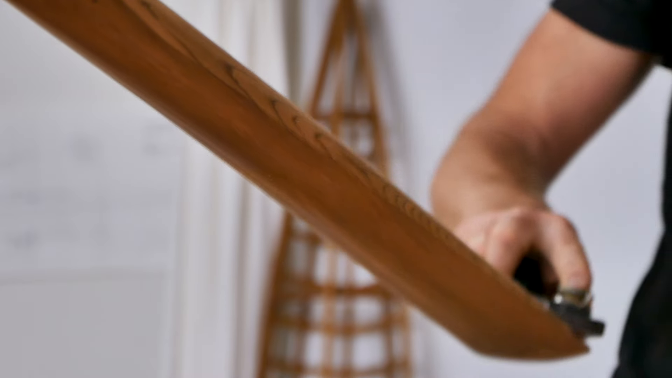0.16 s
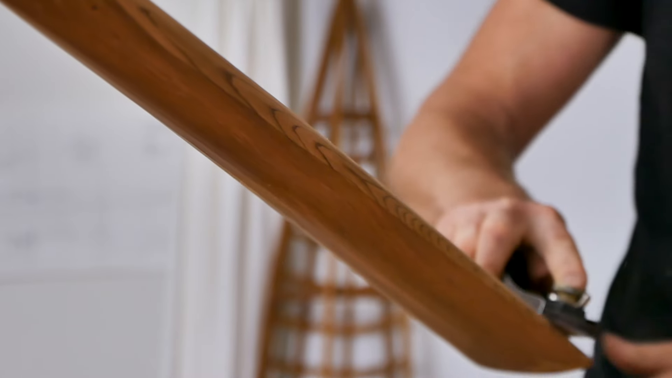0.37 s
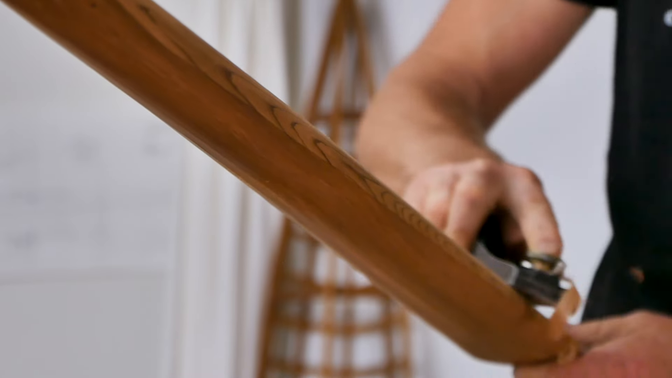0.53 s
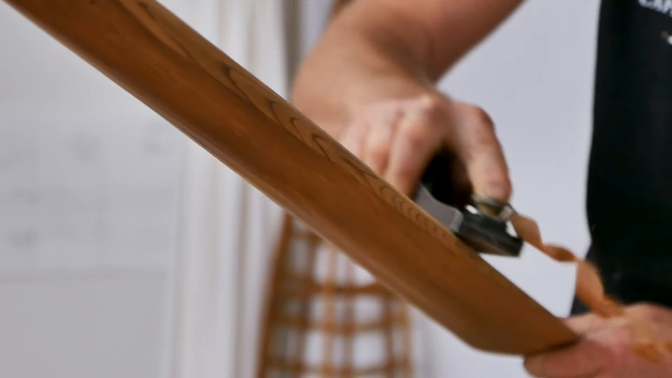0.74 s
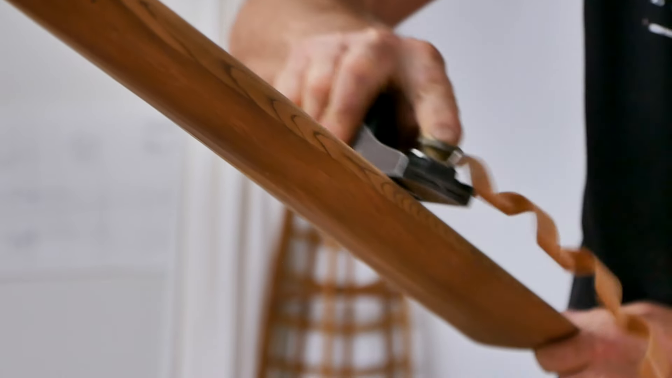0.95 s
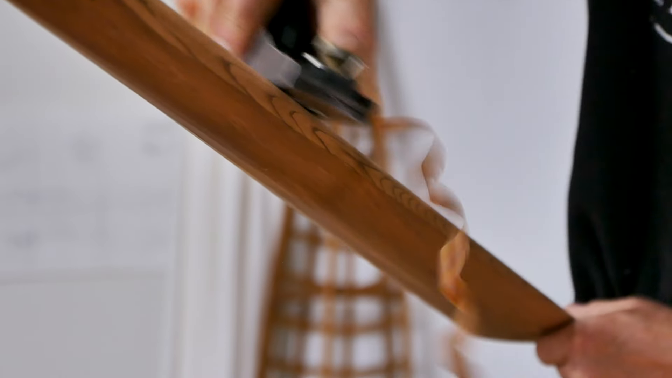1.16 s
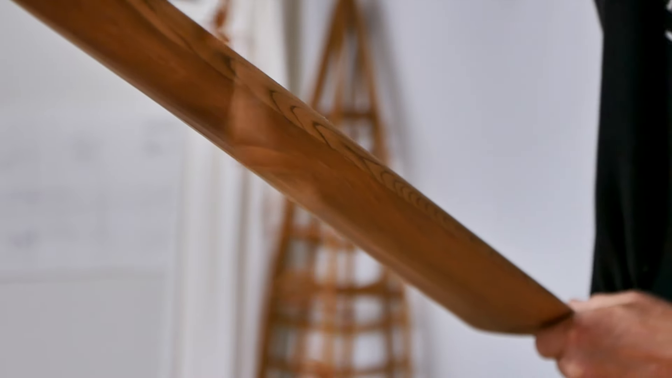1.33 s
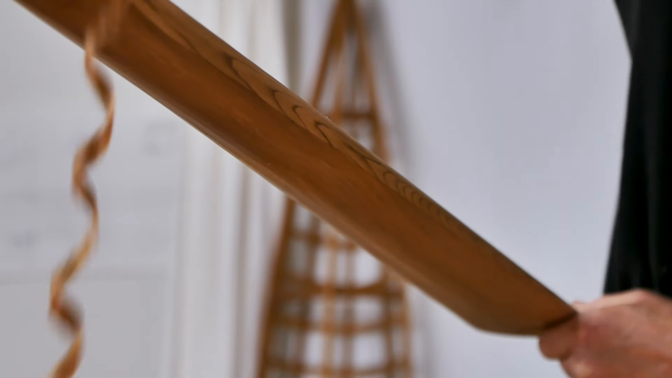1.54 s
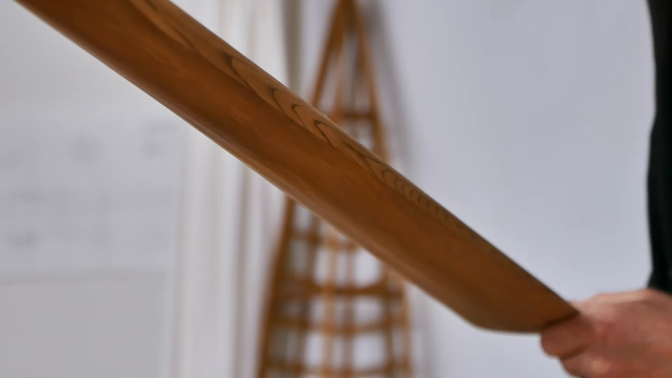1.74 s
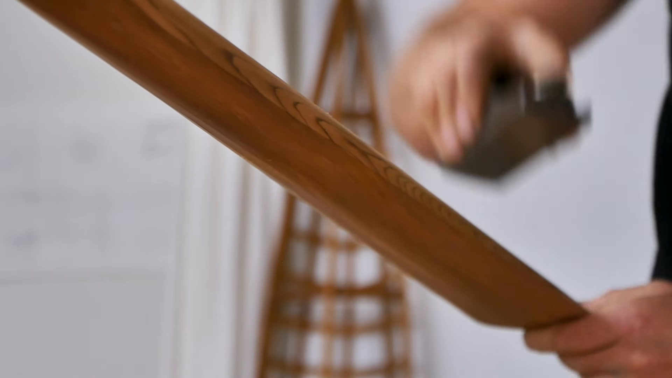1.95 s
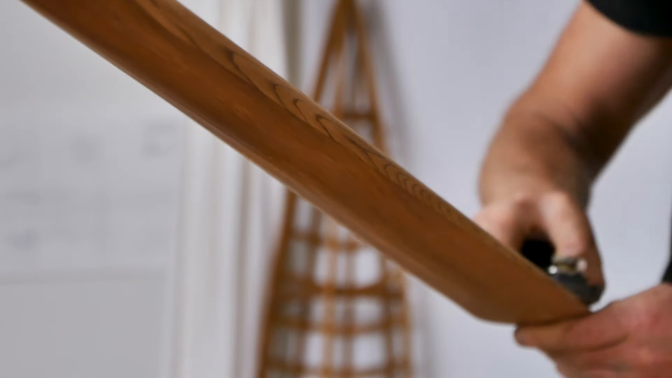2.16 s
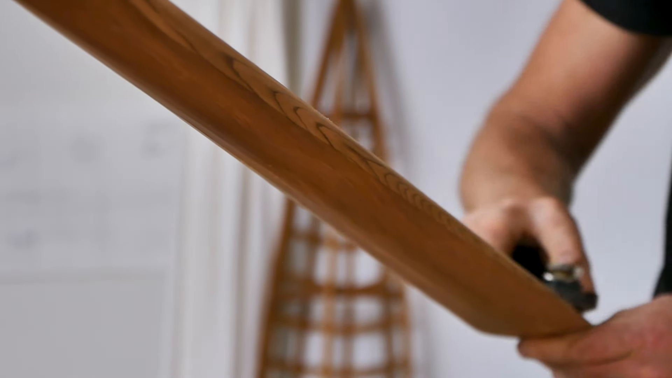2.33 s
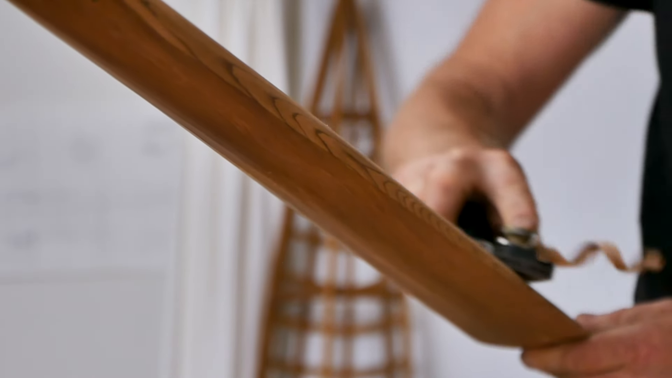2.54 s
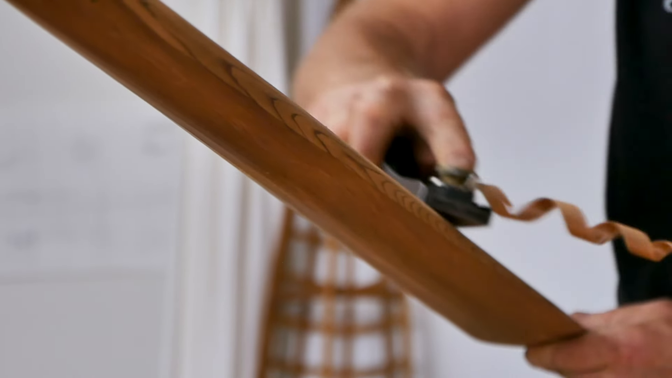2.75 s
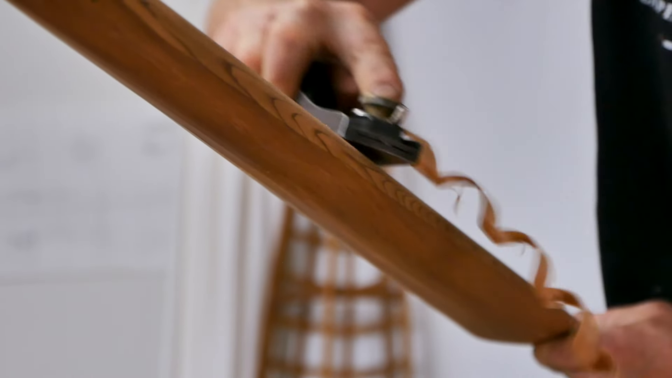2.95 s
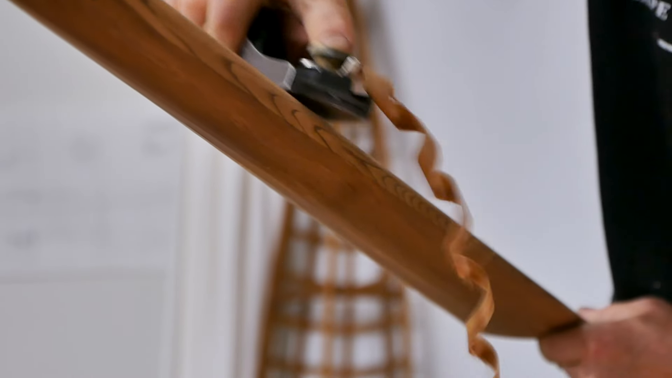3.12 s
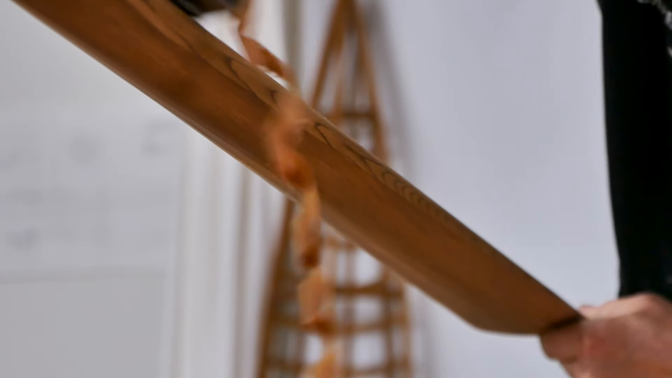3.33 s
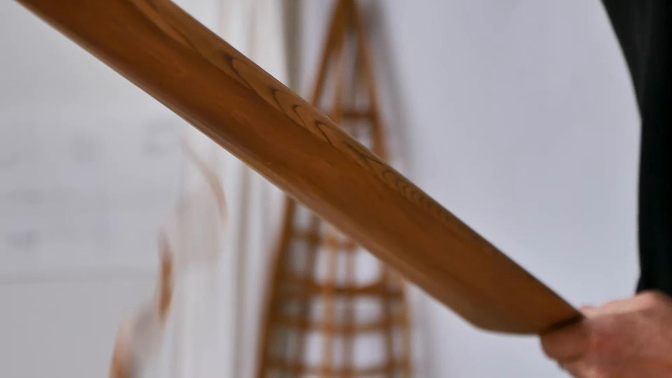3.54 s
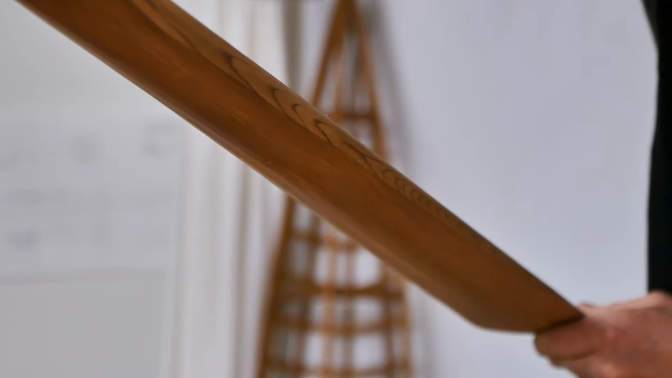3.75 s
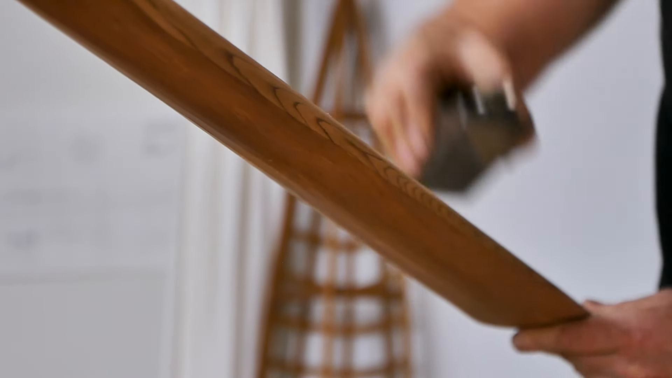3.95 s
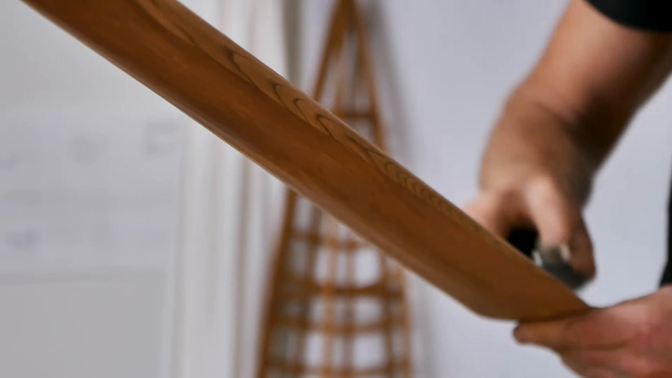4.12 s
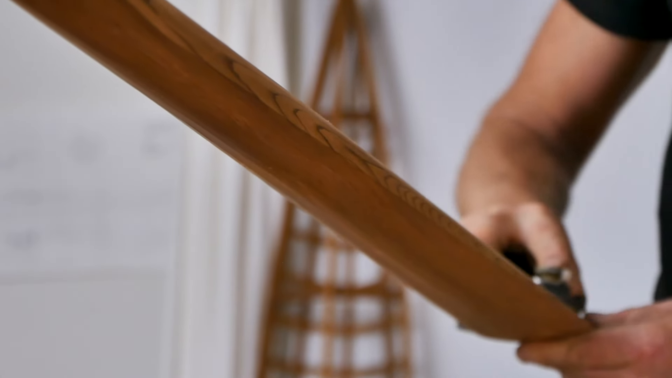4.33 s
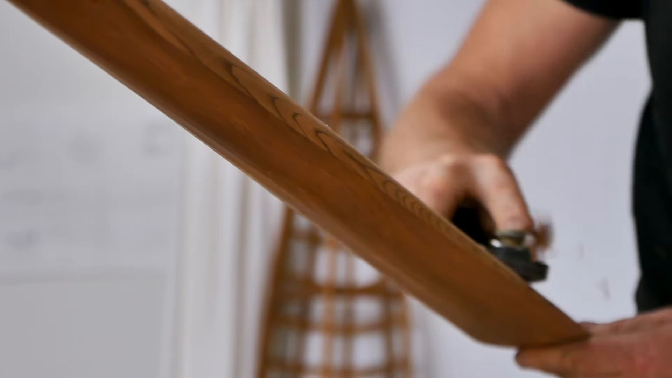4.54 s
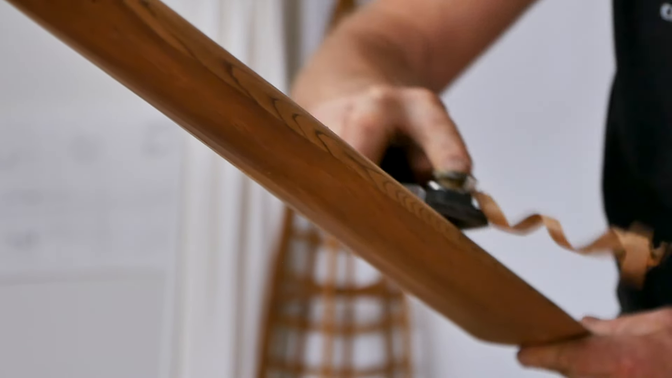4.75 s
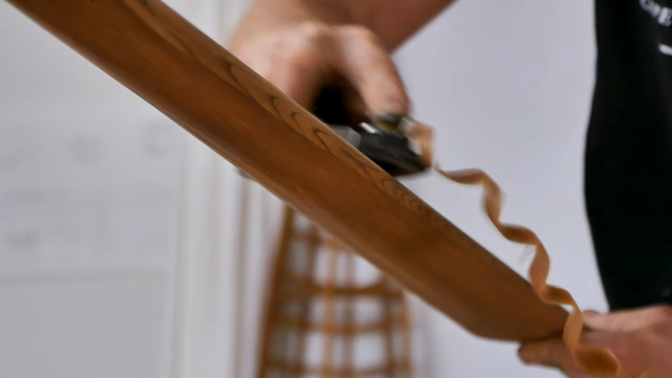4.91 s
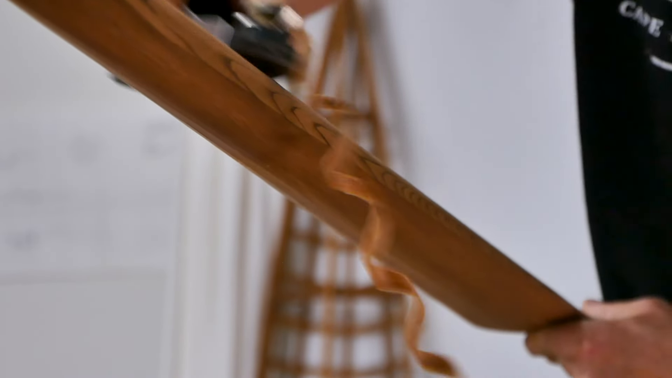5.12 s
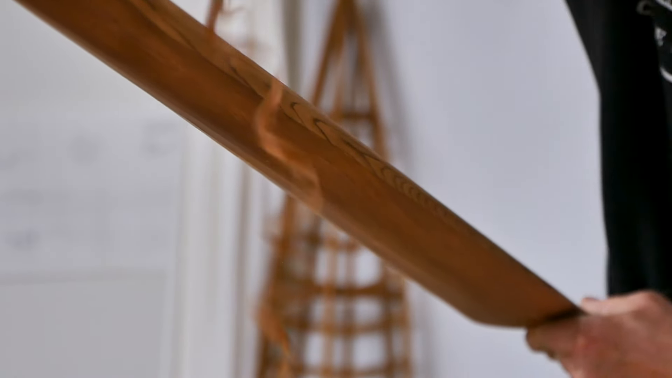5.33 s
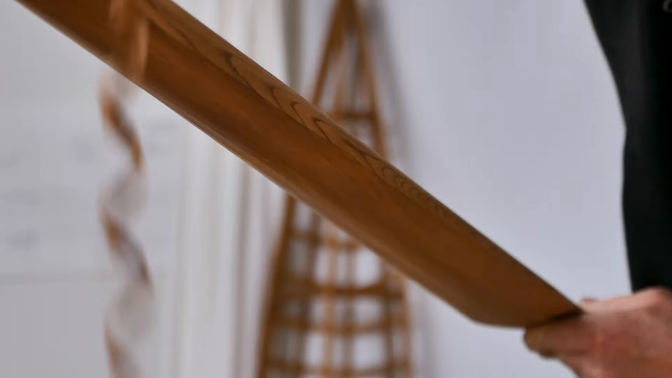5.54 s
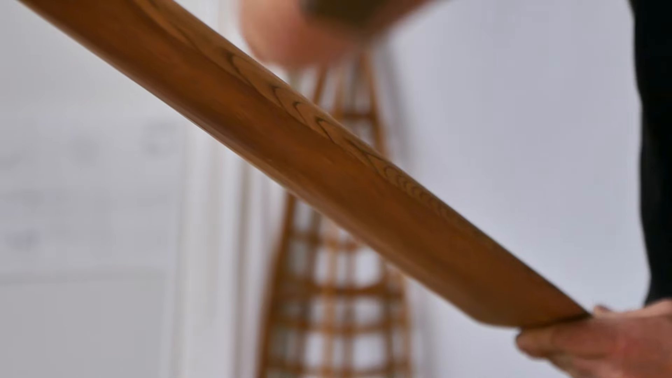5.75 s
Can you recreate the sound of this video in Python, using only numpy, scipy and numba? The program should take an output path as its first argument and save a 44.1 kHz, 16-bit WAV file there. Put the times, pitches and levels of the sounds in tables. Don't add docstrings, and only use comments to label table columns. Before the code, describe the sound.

Close in a small, quiet workshop, a block plane lands on a softwood board with a soft knock, then tears along it in a long crackling hiss. It lifts off; a sleeve rustles faintly and the holding hand bumps. Two more strokes follow, with sharper knocks, the third landing loudest. One close microphone, short room echo.

```python
import sys
import numpy as np
from scipy import signal
from scipy.fft import rfft, irfft, next_fast_len
from scipy.io import wavfile
from scipy.ndimage import uniform_filter1d, map_coordinates
from numba import njit

SR = 44100
rng = np.random.default_rng(int(sys.argv[2]) if len(sys.argv) > 2 else 0)


def store_pcm(level_fs):
    pcm = np.round(np.clip(level_fs, -1, 1) * 32767).astype(np.int16)
    wavfile.write(sys.argv[1], SR, np.atleast_2d(pcm).T)


def ratio(d):
    e = np.asarray(d, float) / 20
    return 10 ** e


N = 259308
TIME = np.arange(N) / SR

# start_s, end_s
STROKE_SPANS = [
    (.115, 1.53),
    (2.262, 3.54),
    (4.247, 5.49),
]
# time_s, edge_load_db, sliding_speed_db
STROKES = [
    [(.115, -71, -96), (.193, -51, -54), (.359, -46, -49), (.46, -34.5, -37), (.62, -36.5, -33),
     (.76, -33.5, -35), (1.17, -35, -36.5), (1.437, -32.5, -36), (1.53, -48, -70)],
    [(2.262, -62, -79), (2.346, -50, -52), (2.456, -34, -36), (2.682, -32, -35), (2.98, -33.5, -37),
     (3.19, -38, -37.5), (3.34, -33.5, -33), (3.49, -35, -42.5), (3.54, -47, -66)],
    [(4.247, -46, -74), (4.38, -45.5, -50.5), (4.435, -34.5, -38.5), (4.533, -28.5, -33.5), (4.7, -33, -38),
     (5.0, -33.5, -38.5), (5.4, -31, -35), (5.453, -32, -37), (5.49, -33, -60.5)],
]
LIFTS = [1.492, 3.517, 5.468]
# pitch_hz, width_hz, level_db, half_waves_along_stroke, start_half_waves
BOARD = [(419, 41, -0.5, 1.12, 0.037), (511, 45, 3, 2.17, 0.41), (612, 48, 3.5, 1.56, 0.99),
         (693, 36, 0.5, 2.82, 0.56), (756.4, 36, 3.5, 1.63, 0.75), (867.5, 56, 2.5, 2.5, 0.34),
         (938, 61, 6.5, 1.86, 0.95), (1014, 45, 2, 2.9, 0.1), (1062, 17, 0.5, 2.85, 0.042),
         (1199, 70, 3, 2.8, 0.03), (1341, 88, 2, 1.42, 0.14), (1470, 220, -5.5, 3.25, 0.045),
         (1739, 15, -6, 3.6, 0.17), (1744, 130, -4.5, 4.4, 0.52), (1892, 190, -3, 2.34, 0.24)]
# pitch_hz, width_hz, level_db
THRUM = [(95.3, 30, -38), (160, 64, 2.5), (246, 35, -1.5), (341, 21, -17)]
# pitch_hz, width_hz, stroke_start_db, stroke_end_db
IRON = [(2390, 130, -8.5, -7), (3160, 550, -25, -41), (4280, 300, -2.5, -7.5), (4780, 290, -15.5, -8)]
# pitch_hz, level_db (per Hz)
CRACKLE = [(880, -13.5), (1500, -2), (1760, 0), (2040, -7), (2380, -5), (3450, -5), (8000, -15.5),
           (10400, -12.5), (17600, -120)]
# pitch_hz, level_db (per Hz)
HISS = [(3530, -41), (6000, -6), (6890, -5), (8640, -6), (10300, -2.5), (13800, 2.5), (15800, -1)]
# middle_s, length_s,
# load_db, hiss_db
GRAIN = [(0.503, 0.021, -14, -2), (0.573, 0.037, -2.5, -3.5), (0.625, 0.03, 0, 3.5),
         (0.688, 0.071, -5.5, -2.5), (1.183, 0.046, -3, -2.5), (1.24, 0.037, -0.5, 4.5),
         (1.281, 0.034, -3.5, -3.5), (1.336, 0.026, -0.2, 2), (1.377, 0.046, -16.5, -5.5),
         (3.035, .05, 3.5, 0), (3.284, 0.1, 4.5, 3), (3.407, 0.031, -4.5, 4), (3.472, 0.035, -20, -7),
         (4.638, 0.047, 1.5, 2), (4.93, 0.075, 2, 0.5), (5.155, 0.035, -7, -2), (5.423, 0.028, -1.5, -3.5),
         (0.38, 0.027, -1.5, 1), (.34, .05, 2, 0), (5.36, 0.027, -2, -1), (5.33, 0.022, 4, -0.5),
         (4.575, .05, 1, -1)]
# time_s, over_steady_thrum_db
JOLTS = [(.52, 16.5), (1.323, 15.5), (1.44, 19), (2.396, 2), (2.976, 12), (3.284, 15), (3.372, 5),
         (3.54, 19), (4.533, 18), (4.931, 6), (5.19, 1), (5.453, 30.5)]
# start_thrum_db, board_shudder_db, thrum_shudder_db, shudder_t60_s
SETTLING = [
    (-43, -30, -34, 0.12),
    (-50, -25, -28.5, 0.18),
    (-51.5, -32.5, -38.5, 0.19),
]
REACH = [
    (0.74, 0.079, 0.495, 0.041),
    (0.7, 0.12, 0.37, 0.077),
    (0.73, 0.075, 0.38, 0.081),
]
MOUTH = [1, 1.5, 5]
# start_s, end_s, start_hz, end_hz, level_db
EDGE_GLIDES = [(.72, 1.13, 14600, 16000, 8.5), (0.64, 0.99, 13000, 14500, -9), (3.1, 3.9, 12800, 12800, -5),
               (1.24, 1.6, 7600, 9000, 3.5), (.8, 0.89, 5300, 5200, -2), (1.31, 1.47, 6400, 7100, 6),
               (2.56, 2.9, 12700, 16600, 4), (2.8, 3.05, 12800, 15200, -8), (2.9, 3.3, 13700, 13000, 5),
               (3.14, 3.21, 9700, 9300, -7), (2.95, 3.4, 3100, 3200, -13), (1.29, 1.36, 6450, 6200, -7),
               (2.36, 2.8, 6900, 7800, -4), (2.1, 2.73, 4400, 5600, 4.5), (4.5, 4.66, 15500, 14900, -10),
               (4.77, 4.93, 15300, 15600, 11), (5.4, 5.9, 11500, 15200, -10), (4.96, 5.16, 14500, 13400, 3),
               (2.6, 3.0, 11300, 12300, 0), (4.64, 5.5, 4800, 5900, -5), (1.3, 1.48, 3500, 3400, -7),
               (5, 5.3, 8200, 6800, 4), (5.26, 5.5, 2170, 1930, -13), (3.1, 3, 13500, 14300, -6),
               (4.4, 4.92, 4600, 4700, -2), (.15, 0.36, 3800, 3800, -7), (2.98, 3.33, 3500, 3600, -6),
               (0.96, 1.2, 17000, 15000, 1.5), (4.45, 4.8, 10400, 9300, 3), (0.57, 1.2, 1600, 1600, -4),
               (0.41, 0.67, 7500, 8500, 0.5), (2.57, 2.72, 3620, 3620, -3), (2.4, 2.76, 2850, 2950, 5),
               (3, 3.27, 4400, 3800, -5), (2.72, 2.92, 5200, 5400, -9), (5.3, 5.52, 1900, 1950, -7),
               (.55, 1.2, 1700, 1840, -4.5), (3.3, 4, 4700, 4900, 4.5)]
# start_s, end_s, start_hz, end_hz,
# level_db
BOARD_GLIDES = [(1.04, 1.4, 440, 440, -8), (3.36, 3.56, 430, 430, -12), (5.08, 5.26, 420, 420, -13),
                (4.85, 5.15, 520, 560, -8), (5.27, 4.9, 2200, 1900, -11), (0.26, 0.465, 560, 530, 9),
                (0.7, .97, 1200, 1020, -5.5), (.55, 1.06, 1400, 1900, -6), (.36, 0.45, 400, 400, -13),
                (0.34, .42, 750, 750, -5), (2.5, 2.72, 1500, 1400, -2), (4.42, 4.6, 1250, 1100, -3.5),
                (2.8, 3.42, 1200, 1500, -11), (1.35, 1.5, 840, 860, 6.5), (1.25, 1.5, 1780, 1780, 11),
                (5.15, 5.28, 890, 900, -7.5), (3.06, 3.13, 960, 930, 2.5), (.2, 0.42, 1680, 1520, 14),
                (3.46, 3.56, 1200, 1200, -4), (5.35, 5.5, 1100, 1100, -4.5), (5.36, 5.47, 580, 700, 1),
                (4.55, 4.62, 1140, 1160, 6), (.4, 0.47, 620, 620, -5), (.58, 0.64, 950, 950, -3),
                (2.7, 2.58, 420, 420, -4), (1.03, 1.35, 290, 290, 10), (1.25, 1.5, 1650, 1600, -2)]
# middle_s, length_s, pitch_hz, level_db
CHATTER = [(.485, 0.16, 1013, -39), (0.49, 0.1, 510, -37.5), (.62, 0.057, 492, -35.5),
           (1.055, 0.12, 433, -46.5), (2.502, 0.11, 986, -35.5), (2.646, .073, 1203, -38),
           (2.597, 0.091, 440, -38), (2.875, 0.079, 905, -40), (3.4, 0.061, 1784, -42),
           (4.502, 0.21, 1004, -42), (4.518, 0.16, 540, -40), (4.673, 0.028, 1072, -29),
           (5.39, 0.18, 503, -36), (3.079, 0.47, 334, -54.5), (1.357, 0.23, 338, -59),
           (4.948, 0.11, 312, -55)]
# middle_s, length_s, pitch_hz, width_hz, level_db
WHISTLE = [(0.27, 0.25, 3900, 90, -61), (0.25, 0.19, 3250, 90, -62), (3.08, 0.55, 4820, 60, -55),
           (4.84, 0.13, 3800, 120, -53), (5.18, 0.39, 4780, 120, -47.5), (5.39, 0.16, 4990, 250, -47.5),
           (5.2, 0.15, 2390, 240, -44.5), (1.37, 0.24, 2380, 240, -47), (1.15, 0.2, 4800, 200, -50),
           (1.27, 0.083, 5300, 180, -46.5), (.14, .05, 3050, 70, -58), (.16, 0.084, 2450, 90, -54)]
# middle_s, length_s, pitch_hz, width_hz, level_db
FLUTTER = [
    (3.31, .14, 11200, 1600, -38),
]
# middle_s, pitch_hz, level_db
GRIP = [(1.51, 257, -53), (1.43, 140, -54), (1.725, 215, -57.5), (1.795, 95, -61), (2.4, 73, -60),
        (1.98, 150, -63), (3.03, 60, -55), (3.55, 234, -58), (3.7, 160, -64), (4.13, 74, -59),
        (2.05, 75, -60), (.63, 256, -47), (.68, 220, -55), (2.52, 250, -53), (4.55, 160, -55),
        (5.55, 224, -57), (5.58, 55, -59.5), (1.96, 70, -59), (1.87, 95, -64), (1.56, 68, -60),
        (3.82, 140, -62)]
# crack_db, thump_db, rattle_db
LANDINGS = [
    (0.1062, -21, -14, -14, -13),
    (2.247, -8, -7.5, -18, -8),
    (4.2324, -2, -16, -28, -16),
]
# pitch_hz, level_db, t60_s
RINGS = [
    [(432, -4, 0.061), (809, 0.5, 0.068), (1220, 0.5, 0.057), (1650, -14, 0.091), (2330, -1.5, 0.036),
     (3070, -4, 0.06), (4300, -12, 0.07), (6640, -16, .02)],
    [(430, -2, 0.019), (856, -3, 0.036), (1245, -2.5, 0.035), (1710, -14, 0.017), (2170, -12, 0.014),
     (3000, -2.5, 0.014), (3540, -15, .03), (4170, -8.5, 0.02), (4850, -10, 0.015)],
    [(480, 1.5, 0.017), (972, 3.5, 0.019), (1330, 6.5, 0.014), (1700, -19, 0.02), (2190, -43.5, .015),
     (2870, -9, 0.022), (3370, -14, .025), (3670, -13.5, .025), (4090, -5, 0.012), (6300, -10.5, 0.009)],
]
# delay_s, over_heel_db
TOE = [
    (.0024, 0),
    (.0024, -10),
    (.0024, -25.5),
]
# start_s, peak_db, centre_hz, t60_s
SNAPS = [(.4654, -30, 4370, 0.052), (.512, -16.5, 13600, .05), (.1068, -40, 13500, 0.011),
         (.593, -18, 13200, 0.033), (.622, -20, 13900, .05), (3.2667, -12.5, 11100, 0.02),
         (3.2765, -18, 6650, 0.029), (3.2763, -14.5, 10300, 0.021), (3.6301, -46, 11500, .015),
         (3.6301, -45, 15000, .015), (3.6301, -52, 6600, .015), (2.2471, -26, 13000, 0.011),
         (4.2321, -24, 14400, 0.0088), (.4457, -27, 13000, .03), (.7151, -20, 13500, .03),
         (2.4966, -19.5, 13060, .03), (4.4218, -27, 12500, .03), (.53, -25.5, 3880, .04),
         (1.3435, -20, 7000, .005), (3.8482, -47, 12200, .02), (3.868, -37.5, 11000, 0.016),
         (3.8985, -41, 13300, .02), (4.1333, -47, 14100, .02), (4.1619, -53, 14000, .02),
         (4.439, -20, 12400, .04), (1.523, -37, 13500, .02), (1.577, -45, 12500, .015),
         (1.612, -46, 13000, .015), (1.697, -49, 700, 0.0092), (4.043, -47, 13500, .015),
         (5.735, -49.5, 4800, 0.054)]
# middle_s, length_s, level_db
SLEEVE = [(.0, 0.13, -61), (1.558, 0.18, -63), (2.0, 0.26, -58.5), (2.186, 0.15, -60), (3.63, .1, -69),
          (3.89, 0.054, -62), (3.968, 0.094, -58.5), (4.09, 0.17, -66), (5.767, 0.011, -70),
          (5.88, 0.1, -69)]
# middle_s, level_db
BUMPS = [(.085, -51), (1.735, -52), (1.775, -65), (2.132, -54), (2.24, -61), (3.66, -47.5), (3.836, -55.5),
         (4.1, -54), (4.17, -54.5), (4.225, -51.5), (5.69, -70)]
# pitch_hz, level_db (per Hz)
CLOTH = [(180, -54.5), (300, 1.5), (485, -6.5), (527, -3), (582, -24), (812, -7.5), (990, -13.5),
         (6780, -15.5), (15800, -14)]
# pitch_hz, level_db (per Hz)
FLOOR = [(15, -36), (25, 2), (144, 0), (403, -8), (857, -7), (955, -13.5), (1640, -16.5), (3780, -23),
         (6660, -20), (13100, -26), (15800, -26.5)]
# pitch_hz, t60_s, level_db
ROOM = [(99.7, 0.74, -3.5), (260, 0.53, -3.5), (700, 0.42, -5.5), (1800, 0.33, -5), (5000, 0.4, -8.5),
        (12000, 0.32, -8.5)]


def strokes():
    board_gain, crackle_gain, hiss_gain, thrum_gain, gate = drive()
    along, which = progress()
    lifted = sum((TIME > s) & (TIME < s + .2) for s in LIFTS)
    gate = gate * uniform_filter1d(1 - 0.98 * lifted, size=300)
    force = fibres(2.48, 1.85)
    board = board_shaded(level(board_ring(force, along)))
    thrum = level(board_thrum(force))
    edge = edge_noise(force, along, crackle_gain, hiss_gain)
    edge = patchy(edge + board_mirror(edge), depth_db=1.0, streak_db=3.0, glides=1,
                  shadow_db=-5.0, mouth_db=np.array(MOUTH)[which])
    return gate * (board_gain * ratio(-2.0) * board + thrum_gain * ratio(-2.5) * thrum + 0.97 * edge)


def drive():
    (load_db, speed_db), gate = curves(STROKES)
    along, which = progress()
    load_db = load_db + sum(db * bell(s, length) for s, length, db, _ in GRAIN)
    speed_db = speed_db + sum(db * bell(s, length) for s, length, _, db in GRAIN)
    crackle_db = -43 + 0.38 * (load_db + 33.5) + 0.29 * (speed_db + 37.0) + 6 * along ** 3.94
    thrum_db, shake_db, hum_db, t60 = np.array(SETTLING)[which].T
    thrum_db = thrum_db - 21 * along + sum(db * bell(s, 0.057) for s, db in JOLTS)
    since = np.maximum(TIME - np.array(STROKE_SPANS)[which, 0], 0)
    shudder = ratio(-60 * since / t60)
    board_gain = ratio(load_db) + ratio(shake_db) * shudder
    crackle_gain = ratio(crackle_db) + ratio(shake_db - 37) * shudder
    late_shudder = shudder * np.minimum(since / 0.024, 1) * 2
    thrum_gain = ratio(thrum_db) + ratio(hum_db) * late_shudder
    return board_gain, crackle_gain, ratio(speed_db), thrum_gain, gate


def progress():
    along = sum(np.clip((TIME - a) / (b - a), 0, 1) * (TIME < b + .3) for a, b in STROKE_SPANS) % 1.0001
    return along, np.searchsorted([b + .3 for _, b in STROKE_SPANS[:-1]], TIME)


def fibres(spread_db, grain_db):
    tears = rng.standard_normal(N) * ratio(spread_db * rng.exponential(size=N))
    return level(tears * ratio(grain_db * (walk(24.956) + walk(90))))


def board_ring(force, along):
    board = 0
    for k, (hz, width, db, waves, start) in enumerate(BOARD):
        grip = 1.84 + np.sin(np.pi * (waves * along + start)) ** 2
        mode = band(force * grip, hz, width) * np.sqrt(40 / width)
        board = board + (-1) ** k * ratio(db) * mode
    return filtered(board, 2, 180)


def board_thrum(force):
    thrum = sum(ratio(db + 3 * walk(9)) * level(band(force, hz, width)) for hz, width, db in THRUM)
    return filtered(thrum, 4, 125)


def edge_noise(force, along, crackle_gain, hiss_gain):
    iron = 0
    for hz, width, start_db, end_db in IRON:
        iron = iron + ratio(start_db + (end_db - start_db) * along) * level(band(force, hz, width))
    crackle = level(colour(fibres(1.8, 0.75), CRACKLE) + ratio(-8.5) * iron)
    hiss = colour(fibres(2.0, 1.0), HISS)
    top = filtered(hiss, 2, 10700, both_ways=True)
    flickers_per_s = 310
    hiss = hiss + top * (ratio(2 * walk(flickers_per_s) - 3.5) - 1)
    return crackle_gain * ratio(0.67) * crackle + hiss_gain * ratio(1.5) * hiss


def board_mirror(edge):
    lag = SR / reach()[0]
    mirror = map_coordinates(edge, [np.arange(N) - lag], order=2, mode="nearest")
    return 0.42 * filtered(mirror, 1, 10000, both_ways=True)


def reach():
    along, which = progress()
    turn, turn_width, drop, drop_width = np.array(REACH)[which].T
    turned = 1 / (1 + np.exp(-(along - turn) / turn_width))
    dropped = 1 / (1 + np.exp(-(along - drop) / drop_width))
    comb_hz = 2880 + 1210 * along + 2400 * turned
    shadow_hz = 6090 + (3200 - 6090) * dropped
    return comb_hz, shadow_hz


def patchy(x, depth_db, streak_db, shadow_db, mouth_db=0, glides=0):
    hz, s, cells = signal.stft(x, SR, nperseg=1024)
    pitch = hz[:, None]
    broad, thin, mottle = rng.standard_normal((3,) + cells.shape)
    for _ in range(2):
        broad = smeared(broad, 18, 7)
        thin = smeared(thin, 3, 11)
        mottle = smeared(mottle, 6, 3)
    treble = 1 / (1 + (6500 / (pitch + 1)) ** 4)
    high_treble = 1 / (1 + (10500 / (pitch + 1)) ** 8)
    shade_db = depth_db * treble * broad / broad.std()
    shade_db = shade_db + streak_db * (1 - 0.5 * treble) * thin / thin.std()
    shade_db = shade_db + 3.1 * high_treble * mottle / mottle.std()
    shadow_hz = np.interp(s, TIME, reach()[1])
    shade_db = shade_db + shadow_db * np.exp(-((pitch - shadow_hz) / 700) ** 2)
    mouth = np.exp(-((pitch - 0.64 * shadow_hz) / 206) ** 2)
    shade_db = shade_db + np.interp(s, TIME, mouth_db + 0 * TIME) * mouth
    shade_db = shade_db + glides * gliding_bands(hz, s, EDGE_GLIDES, .08, .045)
    return signal.istft(cells * ratio(shade_db), nperseg=1024)[1][:N]


def board_shaded(x):
    hz, s, cells = signal.stft(x, SR, nperseg=2048)
    shade_db = gliding_bands(hz, s, BOARD_GLIDES, .11, .11)
    return signal.istft(cells * ratio(shade_db), nperseg=2048)[1][:N]


def swells():
    out, size = np.zeros(N + 2 * SR), SR
    rows = [(s, length, hz, 44 * np.sqrt(hz / 500), db) for s, length, hz, db in CHATTER]
    rows += FLUTTER
    rows += [(s, 0.091, hz, 18, db) for s, hz, db in GRIP]
    rows += WHISTLE
    noise = rng.standard_normal((len(rows), size))
    t = (np.arange(size) - size // 2) / SR
    for (s, length, hz, width, db), n in zip(rows, noise):
        shape = np.exp(-(2 * t / length) ** 4)
        tone = shape * band(band(n, hz, width), hz, 2 * width)
        i = int(s * SR)
        out[i:i + size] += tone * ratio(db) * np.sqrt(np.sum(shape ** 2) / np.sum(tone ** 2))
    return out[size // 2:size // 2 + N]


def landings():
    out, t = np.zeros(N), TIME[:SR // 2]
    noise = rng.standard_normal((len(LANDINGS), len(t)))
    for (s, db, crack_db, _, rattle_db), modes, n, (later, toe_db) in zip(LANDINGS, RINGS, noise, TOE):
        knock = -ring(modes, t) * (1 - np.exp(-t / 0.00016))
        knock = knock + ratio(toe_db) * np.interp(t - later, t, knock)
        crack = band(n * np.exp(-t / 0.001), 3300, 8300)
        rattle = band(band(n * np.exp(-t / 0.023), 1300, 2400), 1450, 3000)
        hit = knock / np.abs(knock).max() + ratio(crack_db) * crack + ratio(rattle_db) * rattle
        i = int(s * SR)
        out[i:i + len(t)] += ratio(db) * hit
    return band(out, 600, 6000)


def ring(modes, t):
    push_s = .00042
    out = 0
    for hz, db, t60 in modes:
        out = out + ratio(db) * np.sin(2 * np.pi * hz * (push_s - t)) * fade(t, t60)
    return out


def thumps():
    out, t = np.zeros(N), TIME[:SR // 2]
    hum = np.sin(2 * np.pi * 148 * t) * np.exp(-t / 0.051)
    hum = hum + 0.9 * np.sin(2 * np.pi * 258 * t) * np.exp(-t / 0.0131)
    hum = hum + 0.19 * np.sin(2 * np.pi * 68 * t) * np.exp(-t / 0.13)
    hum = (1 - np.exp(-t / 0.0078)) ** 2 * hum
    for s, db, _, thump_db, _ in LANDINGS:
        i = int(s * SR)
        out[i:i + len(t)] += ratio(db + thump_db) * hum
    return out


def snaps():
    out, t = np.zeros(N), TIME[:SR // 10]
    noise = rng.standard_normal((len(SNAPS), len(t)))
    for (s, db, hz, t60), n in zip(SNAPS, noise):
        shape = (1 - np.exp(-t / (0.023 * t60))) * fade(t, max(t60, .004))
        burst = band(n * shape, hz, 0.25 * hz)
        i = int(s * SR)
        out[i:i + len(t)] += (ratio(db - 5.0) * burst / np.abs(burst).max())[:N - i]
    return out


def rustle():
    rub = sum(ratio(db) * bell(s, length) for s, length, db in SLEEVE) + ratio(-79.5)
    knock = sum(ratio(db) * bell(s, 0.084) for s, db in BUMPS) + ratio(-84)
    bumps = 0
    for hz in (75, 150, 240):
        bumps = bumps + ratio(1.2 * walk(9.1)) * level(band(rng.standard_normal(N), hz, 0.78 * hz))
    cloth = patchy(colour(fibres(1.3, 1.0), CLOTH), depth_db=1.8, streak_db=3.5, shadow_db=3.5)
    return rub * cloth + knock * ratio(-10.0) * level(bumps)


def workshop(x):
    t = TIME[:SR // 2]
    hz, t60, db = np.transpose(ROOM)
    tail = 0
    for f in 60 * 2 ** np.arange(0, 8.1, .5):
        noise = band(rng.standard_normal(len(t)), f, f / 2.5)
        decay = fade(t, np.interp(np.log(f), np.log(hz), t60))
        tail = tail + ratio(np.interp(np.log(f), np.log(hz), db)) * noise * decay
    tail = tail * (1 - np.exp(-(t / 0.01) ** 2)) * np.sqrt(20 / SR)
    return signal.fftconvolve(x, tail)[:N]


def room_floor():
    return level(colour(rng.standard_normal(N) * ratio(0.5 * walk(4.2)), FLOOR), -63.0)


def level(x, db=0.):
    return x * ratio(db) / np.sqrt(np.mean(x ** 2))


@njit
def svf(x, hz, width):
    y, b, l = np.empty(len(x)), 0., 0.
    g, k = np.tan(np.pi * hz / SR), width / hz
    for i in range(len(x)):
        v = (b + g * (x[i] - l)) / (1 + g * (g + k))
        b, l, y[i] = 2 * v - b, l + 2 * g * v, k * v
    return y


def band(x, hz, width):
    return svf(x, float(hz), float(width))


def filtered(x, order, hz, both_ways=False):
    sos = signal.butter(order, hz, "high", fs=SR, output="sos")
    return signal.sosfiltfilt(sos, x) if both_ways else signal.sosfilt(sos, x)


def colour(x, spectrum):
    hz, db = np.transpose(spectrum)
    size = next_fast_len(N)
    bins = np.maximum(np.arange(size // 2 + 1) * SR / size, 1)
    gain = ratio(np.interp(np.log(bins), np.log(hz), db))
    return level(irfft(rfft(x, size) * gain, size)[:N])


def walk(rate):
    knots = rng.standard_normal(600)
    place = np.arange(0, N + 64, 64) * rate / SR % 590
    return np.repeat(map_coordinates(knots, [place], order=2), 64)[:N]


def curves(tables):
    s, *columns = np.vstack(tables).T
    gate = sum((TIME >= rows[0][0]) & (TIME <= rows[-1][0]) for rows in tables)
    return [np.interp(TIME, s, c) for c in columns], uniform_filter1d(1. * gate, size=250)


def bell(s, length):
    out = np.zeros(N)
    near = slice(max(int((s - 2 * length) * SR), 0), int((s + 2 * length) * SR))
    out[near] = np.exp(-(2 * (TIME[near] - s) / length) ** 2)
    return out


def fade(t, t60):
    return np.exp(-np.log(1000) * t / t60)


def smeared(cells, over_pitch, over_time):
    return uniform_filter1d(uniform_filter1d(cells, size=over_pitch, axis=0), size=over_time, axis=1)


def gliding_bands(hz, s, rows, boost_width, cut_width):
    out = 0
    for start, end, start_hz, end_hz, db in rows:
        share = (s - start) / (end - start)
        centre = start_hz + (end_hz - start_hz) * np.clip(share, 0, 1)
        width = boost_width if db > 0 else cut_width
        out = out + db * np.exp(-(2 * share - 1) ** 4 - ((hz[:, None] / centre - 1) / width) ** 2)
    return out


def scene():
    near = strokes() + swells() + landings() + snaps() + rustle()
    return np.tile(near + workshop(near) + thumps() + room_floor(), (2, 1))


def low_pass(x):
    return signal.sosfilt(signal.butter(12, 16600, fs=SR, output="sos"), x)


def record(dry):
    steep_cut = signal.ellip(12, .3, 75, 15800, fs=SR, output="sos")
    mix = signal.sosfilt(steep_cut, dry)
    return low_pass(mix)


dry = scene()
out = record(dry)
store_pcm(out)
```